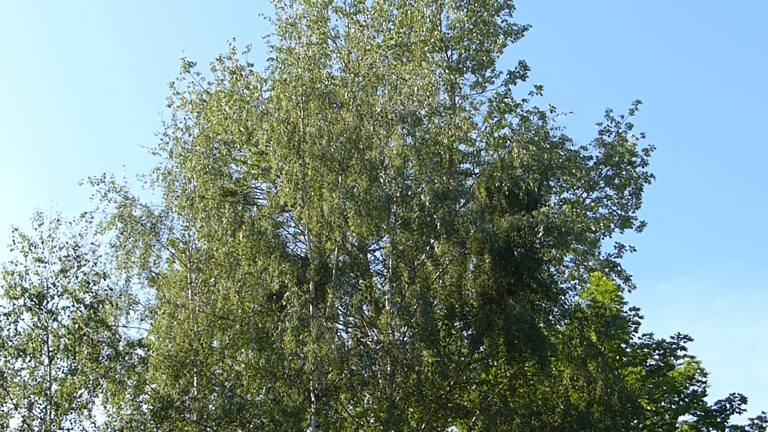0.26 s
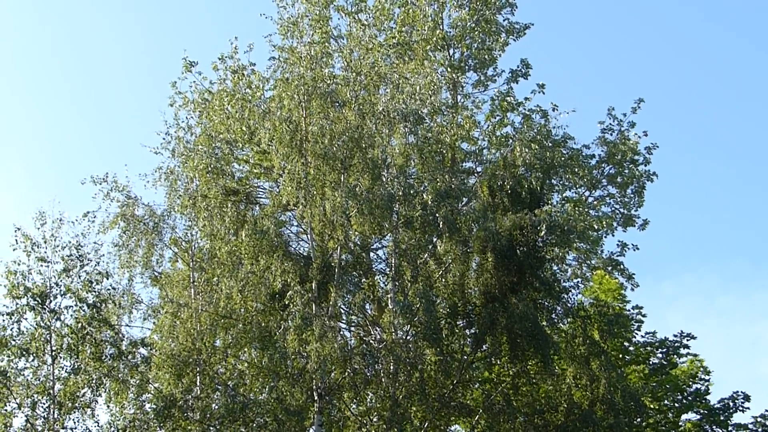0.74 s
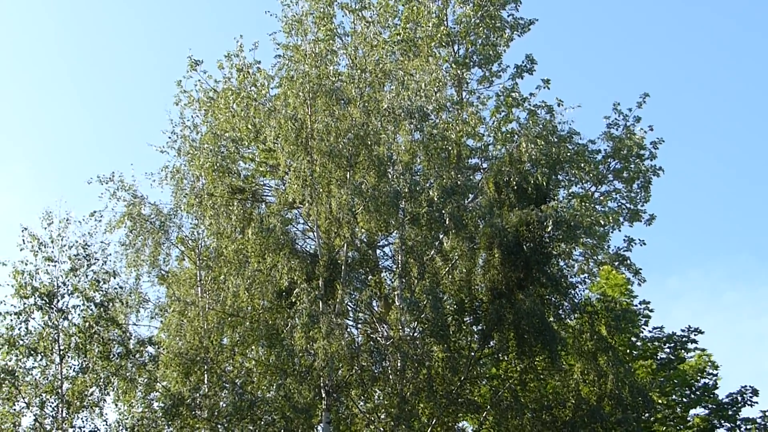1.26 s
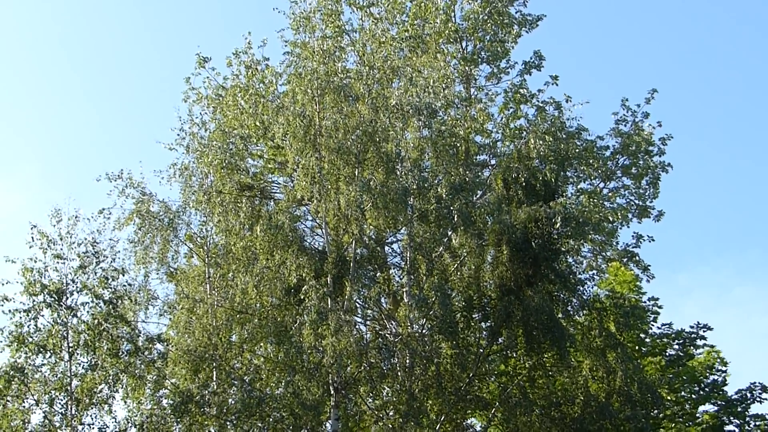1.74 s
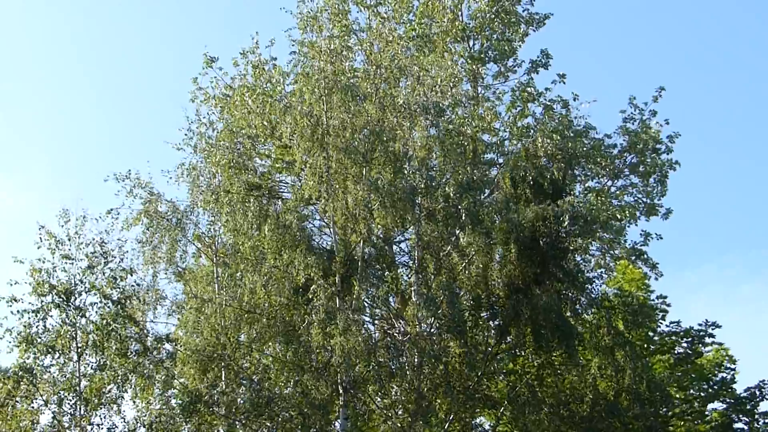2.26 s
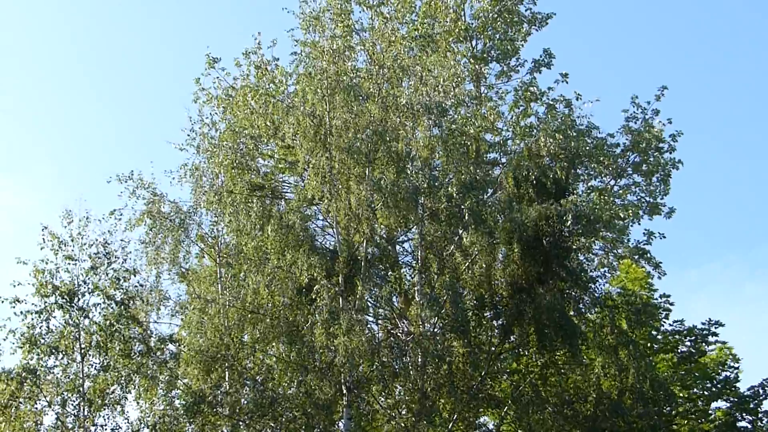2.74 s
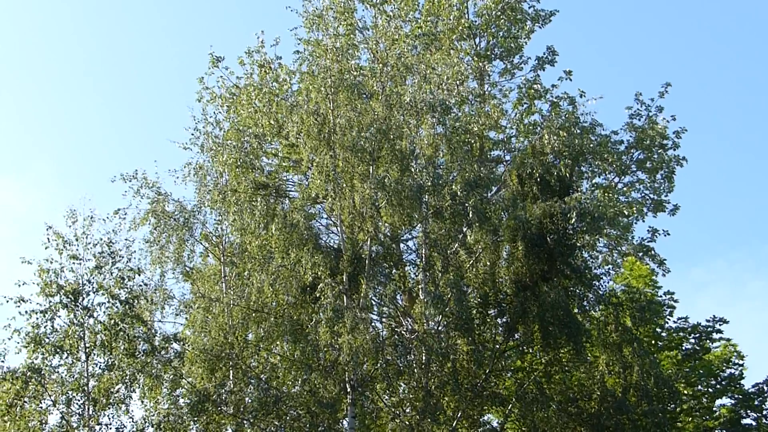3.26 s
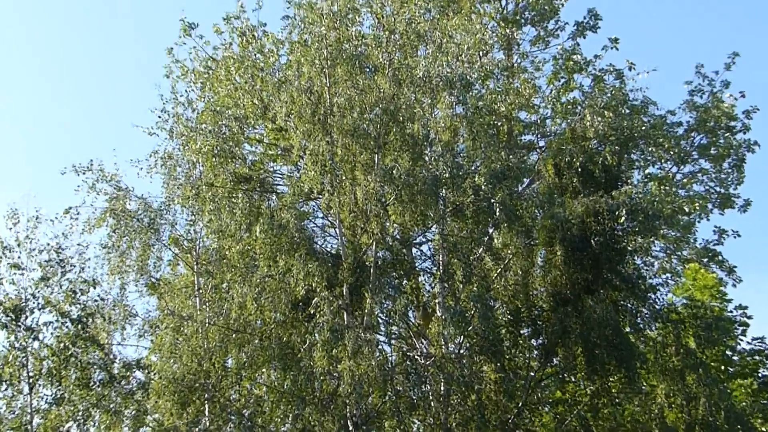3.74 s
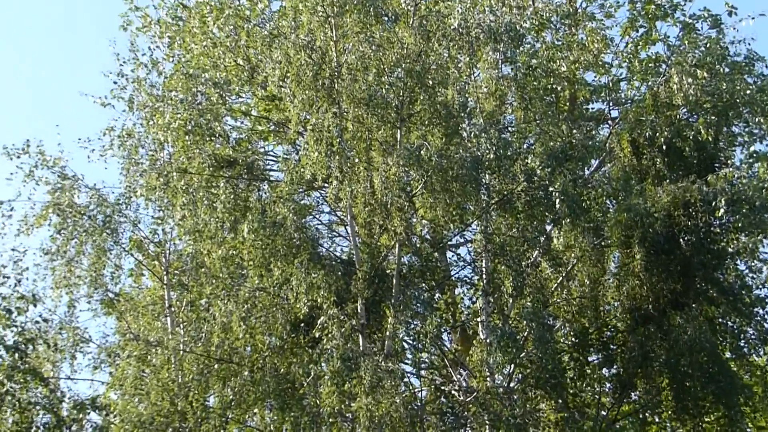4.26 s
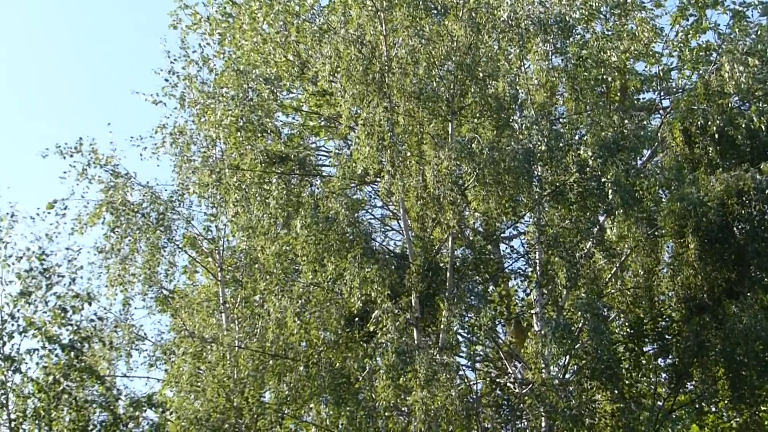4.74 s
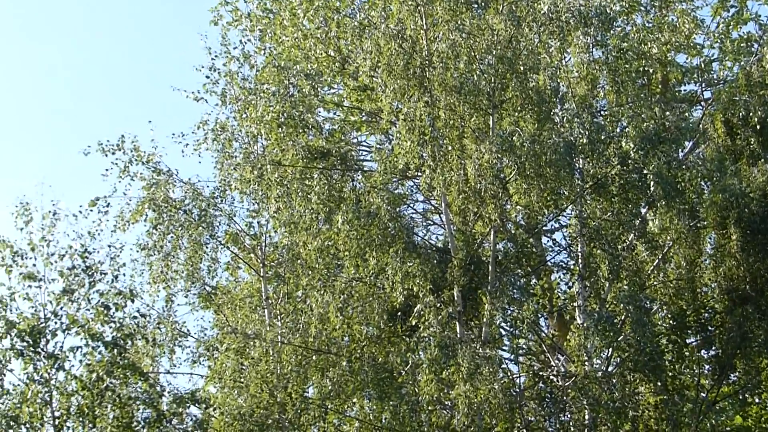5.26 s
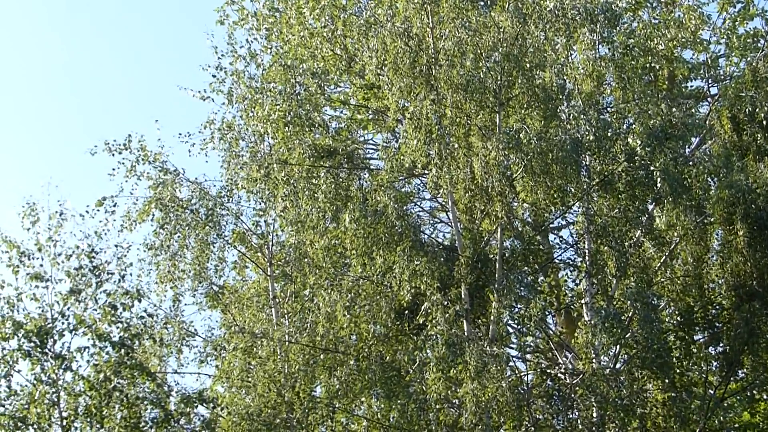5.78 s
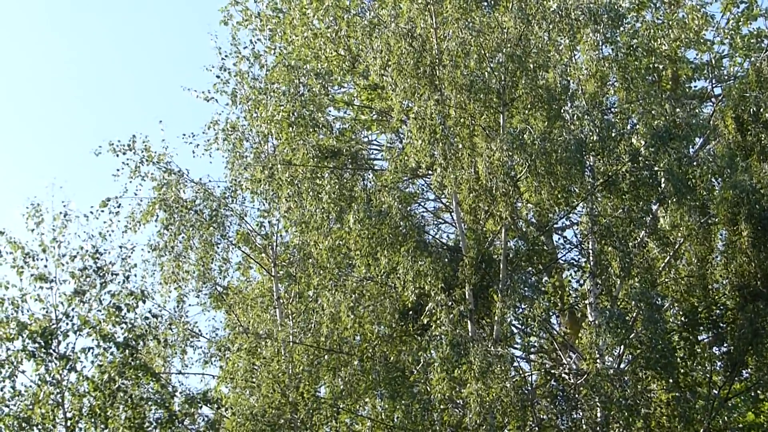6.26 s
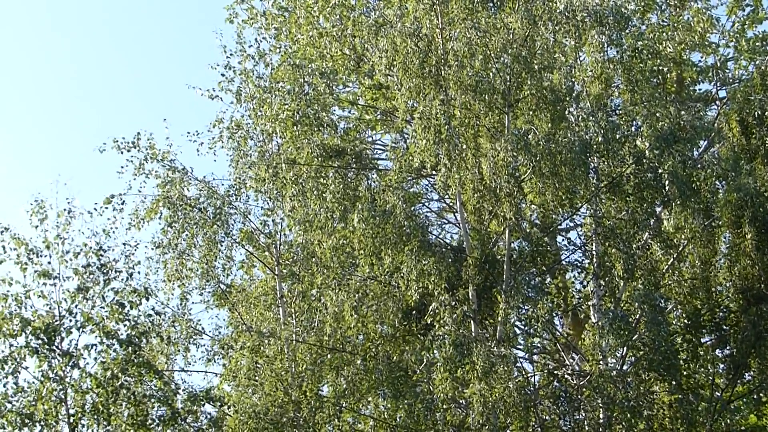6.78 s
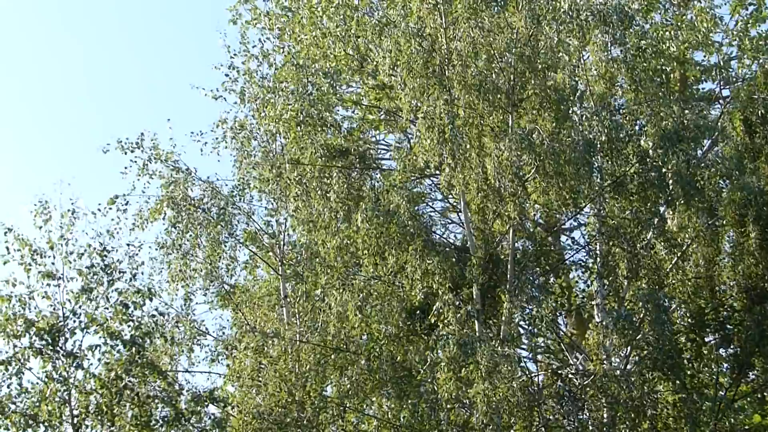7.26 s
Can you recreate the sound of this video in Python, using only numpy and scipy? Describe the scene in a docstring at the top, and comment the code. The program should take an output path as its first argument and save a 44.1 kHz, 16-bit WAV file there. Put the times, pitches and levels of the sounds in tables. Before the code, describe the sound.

A close warbler whistles one fast, high, sweeping phrase for about three seconds, then fainter birds chirp, tick and rasp among trees in quiet air.

```python
"""Warbler in a birch

A warbler sings one fast, high phrase: a nearly pure whistle swept through a few repeated syllables.
Other birds tick, chip, whistle, quaver and rasp further off, each a sine with its own pitch path.
Leaves and trunks scatter every note into a flickering tail of sparse random echoes.
Beneath lies the soft hush of a calm day outdoors, made of shaped noise.
"""
import sys
import numpy as np
from scipy import signal
from scipy.fft import rfft, irfft
from scipy.io import wavfile
from scipy.ndimage import map_coordinates

SR = 44100
rng = np.random.default_rng(int(sys.argv[2]) if len(sys.argv) > 2 else 0)


def unload_audio(sound):
    """Save the sound as a 16-bit wav file, at the path given as the first command line argument."""
    columns = np.transpose(np.atleast_2d(sound))
    # keep every value between -1 and 1, then stretch to whole-number steps
    steps = np.round(np.clip(columns, -1, 1) * 32767)
    wavfile.write(sys.argv[1], SR, steps.astype(np.int16))


N = 331191

# Outdoor hush, the part common to both ears. Each row: frequency in Hz, relative density in dB per Hz.
HUSH_MID = [(15, -47), (25, -16.5), (164, -11), (305, -6.5), (368, -7.5), (469, 0), (552, -8), (895, 6),
            (1050, -4), (1800, -10), (3530, -15.5), (4040, -10), (6050, -13.5), (9300, -15.5), (15500, -30)]
# The part of the hush that differs between the ears. Each row: frequency in Hz, relative density in dB per Hz.
HUSH_SIDE = [(15, -50), (25, -16), (101, -20.5), (410, -3), (631, -5), (804, 2.5), (1570, -13.5),
             (3090, -21), (4040, -20), (6210, -20), (9550, -22.5), (12800, -29), (15500, -41)]
# Soft humps, and one broad dip, in the hush. Each row: centre in Hz, width in Hz, rise in dB.
HUSH_HUMPS = [(225, 31, 6.5), (306, 20.4, 8), (491, 72, 3), (868, 224, -8.5)]
# Gentle swells of the hush; only the distance from the median level counts. Each row: time in seconds, level in dB.
BREEZE = [(0, -62.5), (1.4, -64), (1.85, -61), (2.4, -63), (5.3, -66), (5.7, -61.5), (6.198, -64),
          (7.5, -65)]
# How strongly the foliage scatters each pitch. Each row: frequency in Hz, relative level in dB.
SCATTER = [(1500, -7), (2700, 2), (3600, 3), (5000, -0.5), (5900, 0.5), (6600, 8.5), (8000, 7.5)]
TOP_HZ = 15650  # upper edge of the recorder's treble

# Harsh, buzzy calls from deep in the trees.
# Each row: start in seconds, length in seconds, centre in Hz, relative level in dB.
RASPS = [(0, 0.14, 4434, -53.5), (3.58, 0.073, 6460, -70), (3.656, 0.29, 4525, -60),
         (3.838, .06, 5800, -59.5), (3.835, .26, 1030, -61), (3.887, 0.083, 3940, -55),
         (4.199, 0.02, 4220, -63), (4.32, .08, 5500, -68), (4.457, .2, 4720, -62),
         (4.576, 0.042, 6270, -62.5), (4.69, 0.13, 4460, -55), (4.958, 0.032, 4210, -53),
         (5.05, 0.068, 5000, -59.5), (5.288, 0.037, 4000, -53), (6.014, 0.14, 4780, -54),
         (6.118, .035, 6780, -63.5), (6.328, 0.048, 4310, -50), (6.434, 0.025, 6400, -64.5),
         (6.468, 0.032, 4400, -49.5), (7.232, 0.037, 3190, -60)]
RASP_SPAN = 0.177  # nominal swing either side of the centre, as a share of it
RASP_LEAST_HZ = 420  # least nominal swing, so that a low rasp is harsh too

# One bird ticks on the right, always with the same steep drop. Each row: start in seconds, level in dB.
TICKS = [(3.81, -63), (3.96, -57), (4.108, -60.5), (4.252, -62), (4.408, -58), (4.548, -52), (4.684, -56.5),
         (4.825, -55), (5.921, -71), (6.047, -60)]
TICK_S, TICK_HZ, TICK_PAN_DB = 0.027, [3710, 2578, 1880], -4
# Soft, low arched notes on the left. Each row: start in seconds, level in dB.
HOOTS = [(.835, -50), (.889, -46), (2.314, -53), (2.349, -53), (2.391, -52.5), (2.428, -51)]
HOOT_S, HOOT_HZ, HOOT_PAN_DB = 0.0284, [1396, 1801, 1504], 7.5
# Short chips that droop at the end. Each row: start in seconds, pitch in Hz, level in dB, left minus right in dB.
CHIPS = [(1.306, 3270, -47.5, 4), (1.878, 3630, -41.5, 3.5), (3.335, 3900, -43.5, -1),
         (3.642, 4280, -48.5, -5), (3.688, 5000, -51, 5), (3.763, 5210, -55, 3), (3.882, 3710, -53, -1),
         (3.91, 4230, -46, -5), (4.33, 3730, -51.5, 4), (4.375, 3600, -53, -1), (5.948, 1536, -60, 21),
         (6.075, 1583, -54.5, 12)]
CHIP_S, CHIP_SHAPE = .03, [1.07, 1, .88]  # shape: pitch ratios
# Wide falling slurs. Each row: start in seconds, length in seconds, middle pitch in Hz, level in dB.
FALLS = [(1.07, 0.031, 3360, -53), (2.136, 0.055, 1810, -50), (3.027, 0.045, 3380, -51),
         (3.145, 0.049, 3290, -53.5), (3.274, 0.049, 2940, -59), (3.388, 0.051, 3305, -59),
         (3.503, 0.053, 3200, -58.5), (3.634, 0.032, 3220, -56.5), (5.044, 0.03, 4310, -51),
         (6.154, 0.033, 2630, -54), (6.339, 0.031, 4970, -59.5)]
FALL_SHAPE, FALL_PAN_DB = [1.3, 1, .79], 4.5  # shape: pitch ratios
# Chirrups that zigzag down twice. Each row: start in seconds, pitch in Hz, level in dB.
CHIRRUPS = [(6.322, 4150, -58), (6.711, 4290, -46), (7.108, 4025, -44.5), (7.345, 4160, -42.5)]
CHIRRUP_S, CHIRRUP_PAN_DB = .056, 3
# Path of one chirrup. Each entry: pitch ratio, at even steps through the call.
CHIRRUP_SHAPE = [1.17, 1.06, .91, 1.12, .94, .93]

# Clean whistles that glide and settle on a pitch.
# Each row: start in seconds, length in seconds, first and last pitch in Hz, level in dB, left minus right in dB.
WHISTLES = [(0, 0.014, 3520, 4080, -43.5, 5), (0, 0.038, 6500, 5980, -50.5, 4),
            (.157, 0.14, 3700, 2815, -49, 5.5), (0.336, .044, 4900, 1955, -47.5, 5),
            (1.111, 0.023, 3300, 3610, -43.5, 3), (1.558, .058, 3050, 3660, -44, 3),
            (1.846, 0.11, 2365, 2368, -52.5, -10), (2.325, .03, 3270, 4020, -47, 1),
            (2.349, .098, 2350, 2370, -51.5, -9.5), (3.012, 0.15, 2620, 2696, -59, 5),
            (4.457, 0.034, 6100, 5080, -62, -10), (4.872, 0.03, 1760, 2220, -59, 11),
            (5.1, .088, 3116, 4164, -44, 4), (5.252, .043, 6700, 4550, -47.5, 5),
            (5.371, 0.027, 1740, 2750, -60, 6), (5.422, 0.025, 1740, 2740, -60, 7),
            (5.782, .045, 5970, 4350, -64, 13), (5.622, 0.079, 3450, 2410, -54.5, 7),
            (6.162, 0.19, 5230, 5900, -61.5, -5), (6.216, .13, 3770, 4090, -53, -5),
            (6.48, 0.023, 4710, 3390, -48, 5), (6.5, 0.091, 3170, 3493, -51.5, 5.5),
            (6.587, 0.088, 2840, 2820, -53.5, 6), (6.712, 0.093, 2830, 2830, -60, 4),
            (6.877, 0.052, 6480, 6580, -69, -6), (6.855, 0.047, 1760, 2550, -55, 6),
            (6.892, 0.19, 2520, 2584, -60.5, 5), (6.99, 0.16, 5180, 5900, -61.5, -8),
            (7.012, 0.19, 3615, 3970, -59, -6), (7.261, 0.025, 2400, 3210, -54, 4),
            (7.28, 0.056, 8400, 7900, -66.5, -3)]
SETTLE = 2.2  # time constants of the glide within one whistle

# A low singer on the left, whose notes quaver.
# Each row: start in seconds, length in seconds, first, middle and last pitch in Hz, level in dB.
QUAVERS = [(0.067, 0.027, 2260, 2170, 1830, -54), (0.405, 0.11, 1924, 2583, 2350, -50),
           (0.554, 0.067, 2610, 2530, 2160, -53.5), (0.623, .064, 2590, 2537, 2350, -50),
           (0.69, .071, 2205, 1940, 1600, -49), (1.219, 0.063, 2340, 2680, 2180, -56),
           (1.349, .15, 2870, 2667, 2626, -51), (1.971, 0.098, 2220, 2460, 2284, -55),
           (2.07, .2, 2860, 2960, 2740, -60), (2.399, .15, 2790, 2900, 2650, -58.5),
           (2.586, 0.133, 3164, 3380, 3230, -54.5), (2.778, 0.15, 3470, 3365, 3200, -56),
           (2.609, .12, 2146, 2460, 2556, -53), (2.771, 0.078, 2585, 2450, 1965, -51),
           (2.929, .07, 2473, 2375, 1940, -55.5), (4.55, 0.042, 2250, 1955, 2500, -58),
           (4.772, 0.098, 1400, 1620, 1400, -54.5), (5.498, 0.061, 1970, 2720, 2870, -56),
           (6.248, .056, 2064, 2072, 2415, -50), (6.989, 0.059, 1697, 1830, 1750, -56.5)]
QUAVER_DEPTH_HZ, QUAVER_PAN_DB = 146, 6.5
# The same singer stammers down a run of short notes; the shape holds pitch ratios through one note.
RUN_START_S, RUN_STEP_S, RUN_NOTE_S = 5.698, .039, 0.024
RUN_HZ, RUN_STEP_RATIO, RUN_SHAPE, RUN_DB = 2390, .92, [1.1, 0.98, 0.97], -50.5

# The warbler's phrase, keyed by motif or lone stroke.
# Each row: start in seconds, pitch ratio, relative level in dB.
SONG = { "flourish": [(.182, 1, -32.5), (.412, 1, -31.5), (.729, 1, -31.5)], "slur": [(.6095, 1.01, -31.5)],
        "hook": [(.906, 1, -32)], "tsip": [(.985, 1.02, -31.5), (1.099, 1.034, -33.5), (1.211, 1, -33)],
        "slide": [(1.343, 0.98, -33.5)], "arch": [(1.533, 0.99, -35.5)], "warble": [(1.6765, 0.97, -34),
        (1.9365, 0.98, -34.5)], "rattle": [(2.184, 0.98, -33), (2.3765, 1.004, -33), (2.57, 1.025, -35.5),
        (2.764, 1, -35)], "flick": [(2.952, .93, -38)], "lift": [(1.59, 1, -35)],
        "see": [(2.969, 1.21, -36.5), (3.01, 0.98, -38), (3.081, 1, -36), (3.1515, 1.015, -38),
        (3.2235, 1.035, -37.5)], "chup": [(3.269, 0.99, -32.5)], }
# Groups of strokes sung in quick succession, keyed by motif; some strokes also occur alone.
# Each row: stroke, delay in seconds, relative level in dB.
MOTIFS = { "flourish": [("whip", -0.023, -15), ("whip", -0.0022, -9.5), ("ripple", 0.033, -8),
          ("slur", .072, 0)], "tsip": [("pip", 0, -5.5), ("dive", .025, 0)],
          "warble": [("flick", -0.0015, -2), ("arch", 0.0078, 0.61), ("rise", .059, -4),
          ("chew", .091, 0.84), ("twiddle", .151, -3)], "rattle": [("vee", -0.000983, -3.5),
          ("chew", .043, 0), ("twiddle", .1025, -0.64)], }
# The warbler's strokes, keyed by name. Each row: length in seconds, pitches in Hz at even steps through the stroke.
STROKES = { "whip": (.026, [4280, 4653, 4960, 6380, 9200]), "flick": (.013, [5800, 6300, 9500]),
           "ripple": (0.053, [9120, 7200, 7100, 7800, 6380, 6180, 6600]),
           "slur": (.066, [6600, 5774, 5550, 4960, 4703]), "hook": (.042, [6290, 5400, 5050, 4950, 5130]),
           "pip": (0.0174, [5100, 6400, 4500]), "dive": (.049, [8400, 5500, 4880, 4200, 4030, 3790]),
           "slide": (0.12, [8300, 6160, 5480, 4840, 4540, 4130, 3620]),
           "arch": (0.054, [7250, 4660, 5030, 5380, 4750, 4140, 4350]),
           "lift": (0.0326, [6400, 5450, 5600, 5900, 6020]), "rise": (.03, [4560, 5800, 6260, 6900]),
           "chew": (.051, [4886, 5420, 4780, 4390, 4090, 3490]),
           "twiddle": (0.036, [4395, 4940, 4490, 3893, 4370, 4900, 4940]),
           "vee": (0.036, [8180, 5450, 5520, 6170, 6880]), "see": (0.034, [7710, 5710, 5580, 5900, 6920]),
           "chup": (.044, [4440, 4960, 4500, 4200, 4004, 3770]), }
# The warbler's throat favours the middle of its range. Each row: pitch in Hz, relative level in dB.
THROAT = [(3500, -10.5), (4000, -7.5), (4700, -2.5), (5300, 0), (6000, -4), (6700, -10.5), (7600, -16),
          (9500, -10)]


def undb(db):
    """Decibels to gain."""
    return 10 ** (np.asarray(db) / 20)


def unit(x):
    """Scale to rms 1."""
    return x / np.sqrt(np.mean(x ** 2))


def add(track, s, sound, pan_db=0):
    """Mix a sound into a stereo track at s seconds, pan_db louder on the left."""
    i = max(int(s * SR), 0)
    sides = undb(np.array([[pan_db], [-pan_db]]) / 2)
    track[:, i:i + len(sound)] += sound[:max(N - i, 0)] * sides


def wander(n, rate):
    """Smooth chance of spread near 1 that changes rate times a second."""
    knots = rng.standard_normal(512)
    return map_coordinates(knots, [np.arange(n) * rate / SR], order=3, mode="wrap")


def swell(u, edge):
    """Rounded rise and fall over u = 0..1, each taking the share edge."""
    return np.sin(np.pi / 2 * np.clip(np.minimum(u, 1 - u) / edge, 0, 1))


def contour(pitches, length):
    """A smooth pitch path through evenly spaced pitches, length seconds long."""
    place = np.linspace(0, len(pitches) - 1, int(length * SR))
    return np.exp(map_coordinates(np.log(pitches), [place], order=2, mode="nearest"))


def whistle(hz, overtone_db=-46):
    """The syrinx: a sine of rms near 1 with a trace of its octave."""
    phase = 2 * np.pi * np.cumsum(hz) / SR
    octave = (hz < SR / 4) * np.sin(2 * phase)  # left out where it would alias
    return np.sqrt(2) * (np.sin(phase) + undb(overtone_db) * octave)


def note(path, db, depth_hz=0, trill_hz=105, uneven=.2, waver=0.0073, flutter_db=1.5, edge=0.16):
    """One whistled note along a pitch path, shaken by a fast, uneven trill depth_hz deep."""
    n = len(path)
    trill = np.sin(2 * np.pi * np.cumsum(trill_hz * (1 + uneven * wander(n, 61.7))) / SR)
    hz = path * (1 + waver * wander(n, 201.3)) + depth_hz * trill
    loudness = db + flutter_db * wander(n, 84.0)
    return whistle(hz) * swell(np.arange(n) / n, edge) * undb(loudness)


def hush(spectrum, db, swell_hz=750, swell_octaves=0.98):
    """Distant air and leaves: a soft noise with a few humps, whose middle range swells."""
    f = np.maximum(np.arange(N // 2 + 1) * SR / N, 1)
    points, levels = np.transpose(spectrum)
    colour = np.interp(np.log(f), np.log(points), levels)
    colour = colour + sum(rise / (1 + (2 * (f - hz) / width) ** 2) for hz, width, rise in HUSH_HUMPS)
    noise = unit(irfft(rfft(rng.standard_normal(N)) * undb(colour), N))
    band = np.exp(-(np.log2(f / swell_hz) / swell_octaves) ** 2)
    middle = irfft(rfft(noise) * band, N)
    s, breeze_db = np.transpose(BREEZE)
    gust = undb(np.interp(np.arange(N) / SR, s, breeze_db - np.median(breeze_db)))
    return (noise + (gust - 1) * middle) * undb(db)


def trees(x, leaves_db, leaves_t60, wood_db, wood_t60, alike, build_s):
    """Direct sound, quick echoes from nearby branches and a long tail from the trees around (t60 in s)."""
    t = np.arange(int(1.5 * SR)) / SR
    # sparse echoes: only about 3 in 100 instants hold one, which makes the tail flicker
    echoes = rng.standard_normal((3, len(t))) * (rng.random((3, len(t))) < .03)
    near = (1 - np.exp(-t / 0.0036)) * undb(-60 * t / leaves_t60)
    far = (1 - np.exp(-t / build_s)) * undb(-60 * t / wood_t60)
    decay = np.hypot(undb(leaves_db) * unit(near), undb(wood_db) * unit(far)) / np.sqrt(len(t))
    # the first echo train reaches both ears, the other two one ear each
    share = np.clip(alike, 0, 1)
    response = decay * unit(np.sqrt(share) * echoes[0] + np.sqrt(1 - share) * echoes[1:])
    colour = np.interp(np.fft.rfftfreq(len(t), 1 / SR), *np.transpose(SCATTER))
    response = irfft(rfft(response) * undb(colour), len(t))
    response[:, 0] += 1  # direct sound
    return signal.fftconvolve(x, response, axes=1)[:, :N]


def chorus(db=-68, glide=.25, count=260):
    """Many far birds: faint random slurs, up to glide octaves up or down, at random places."""
    out = np.zeros((2, N))
    timing, character = rng.random((count, 2)), rng.standard_normal((count, 4))
    for (when, size), (pitch, slope, loud, side) in zip(timing, character):
        u = np.linspace(0, 1, int((0.0329 + 0.0627 * size) * SR))
        hz = 4200 * 2 ** (.4 * np.tanh(pitch) + glide * np.tanh(slope) * u)
        slur = whistle(hz) * swell(u, 0.76) * undb(db + 2 * np.tanh(loud))
        add(out, when * N / SR, slur, 4 * side)
    return out


def rasps(buzz_hz=120, uneven=0.243, rough=0.324, edge=0.042):
    """A whistle thrown quickly and unevenly up and down its range turns into a rasp."""
    out = np.zeros((2, N))
    for s, length, centre, db in RASPS:
        n = int(length * SR)
        cycle = np.cumsum(buzz_hz * (1 + uneven * wander(n, 150))) / SR
        swing = 0.87 * signal.sawtooth(2 * np.pi * cycle, .5) + rough * wander(n, 900)
        hz = centre + max(RASP_SPAN * centre, RASP_LEAST_HZ) * swing
        add(out, s, whistle(hz) * swell(np.arange(n) / n, edge) * undb(db), pan_db=3.2)
    return out


def chirps():
    """The neighbours' short calls: each kind keeps its own pitch shape."""
    out = np.zeros((2, N))
    for s, db in TICKS:
        add(out, s, note(contour(TICK_HZ, TICK_S), db), TICK_PAN_DB)
    for s, db in HOOTS:
        add(out, s, note(contour(HOOT_HZ, HOOT_S), db), HOOT_PAN_DB)
    for s, hz, db, pan_db in CHIPS:
        add(out, s, note(hz * contour(CHIP_SHAPE, CHIP_S), db), pan_db)
    for s, length, hz, db in FALLS:
        add(out, s, note(hz * contour(FALL_SHAPE, length), db), FALL_PAN_DB)
    for s, hz, db in CHIRRUPS:
        path = hz * contour(CHIRRUP_SHAPE, CHIRRUP_S)
        add(out, s, note(path, db, depth_hz=90, edge=0.42), CHIRRUP_PAN_DB)
    return out


def whistles():
    """Clean notes that glide quickly at first and then level out."""
    out = np.zeros((2, N))
    for s, length, start, end, db, pan_db in WHISTLES:
        ease = 1 - np.exp(-SETTLE * np.linspace(0, 1, int(length * SR)))
        path = start + (end - start) * ease / ease[-1]
        add(out, s, note(path, db), pan_db)
    return out


def low_singer(count=4, throb_hz=27, throb_db=1.0, sag=0.032):
    """Quavering arcs that throb in loudness and pitch together, and one run of even notes that step down."""
    out = np.zeros((2, N))
    for s, length, start, middle, end, db in QUAVERS:
        path = contour([start, middle, end], length)
        pace = throb_hz * (1 + .15 * wander(len(path), 30.9))
        throb = -np.cos(2 * np.pi * np.cumsum(pace) / SR)
        loudness = db + throb_db * (throb - .5)
        quaver = note(path * (1 + sag * throb), loudness, depth_hz=QUAVER_DEPTH_HZ)
        add(out, s, quaver, QUAVER_PAN_DB)
    for k in range(count):
        path = RUN_HZ * RUN_STEP_RATIO ** k * contour(RUN_SHAPE, RUN_NOTE_S)
        add(out, RUN_START_S + k * RUN_STEP_S, note(path, RUN_DB), QUAVER_PAN_DB)
    return out


def warbler(waver=0.0049, flutter_db=1.5, attack_s=0.0078, release_s=0.0025, husk_db=-24, husk_hz=4200):
    """Each stroke is one learnt sweep of pitch, loudest where the throat rings, never repeated quite exactly."""
    out = np.zeros((2, N))
    for name, repeats in SONG.items():
        for stroke, delay, stroke_db in MOTIFS.get(name, [(name, 0, 0)]):
            length, pitches = STROKES[stroke]
            path = contour(pitches, length)
            n = len(path)
            t = np.arange(n) / SR
            ramp = np.minimum(t / attack_s, (length - t) / release_s)
            pressure = np.sin(np.pi / 2 * np.clip(ramp, 0, 1))
            for s, ratio, db in repeats:
                hz = path * ratio * (1 + waver * wander(n, 315))
                # turbulence in the throat spreads a faint husk either side of the tone
                tone = whistle(hz) * (1 + undb(husk_db) * wander(n, husk_hz))
                throat_db = np.interp(hz, *np.transpose(THROAT))
                loudness = db + stroke_db + throat_db + flutter_db * wander(n, 202)
                add(out, s + delay, tone * pressure * undb(loudness), pan_db=0.7)
    return out


def scene():
    """The further off a bird sits, the more of its sound arrives by way of the trees."""
    air = hush(HUSH_MID, db=-56.0) + np.array([[1], [-1]]) * hush(HUSH_SIDE, db=-57)
    hidden = trees(rasps() * undb(-1.0) + chorus(), leaves_db=2, leaves_t60=0.085,
                   wood_db=-0.5, wood_t60=0.37, alike=0.54, build_s=0.02)
    others = trees(chirps() + whistles() + low_singer(), leaves_db=-4, leaves_t60=0.13,
                   wood_db=-4.5, wood_t60=1.0, alike=0.8, build_s=0.015)
    singer = trees(warbler() * undb(0.9), leaves_db=-5, leaves_t60=0.24,
                   wood_db=-6, wood_t60=0.67, alike=0.77, build_s=0.017)
    return air + hidden + others + singer


def record(dry):
    """The recorder cuts the top of the treble with a steep low-pass."""
    return signal.sosfilt(signal.ellip(10, .1, 70, TOP_HZ, fs=SR, output="sos"), dry)


dry = scene()
out = record(dry)
unload_audio(out)
```